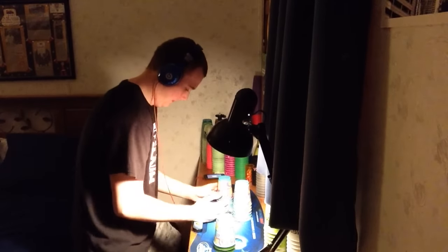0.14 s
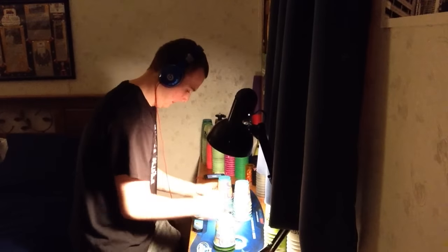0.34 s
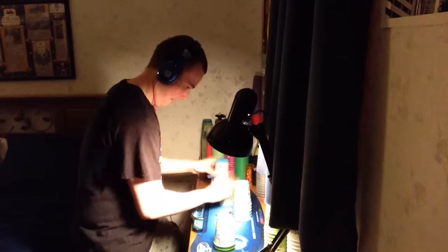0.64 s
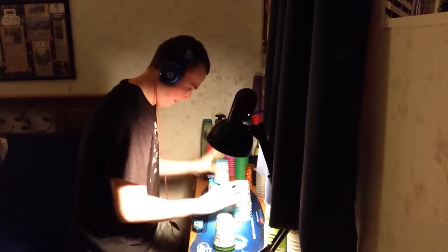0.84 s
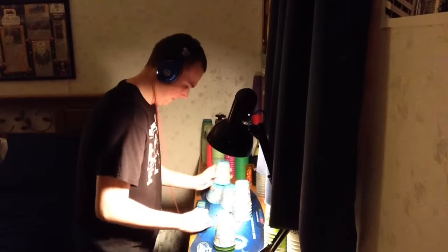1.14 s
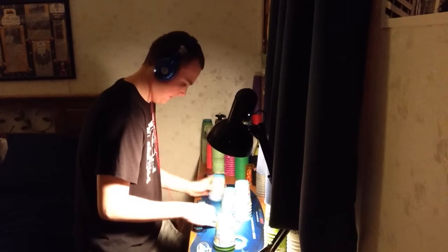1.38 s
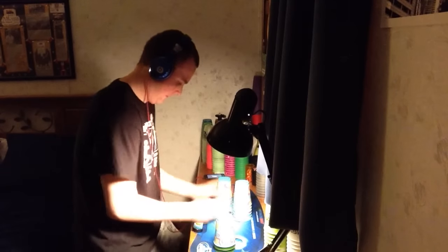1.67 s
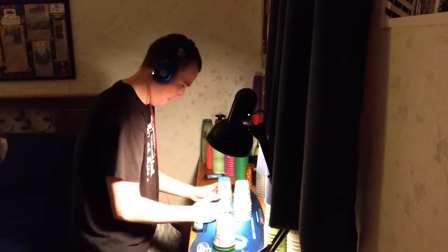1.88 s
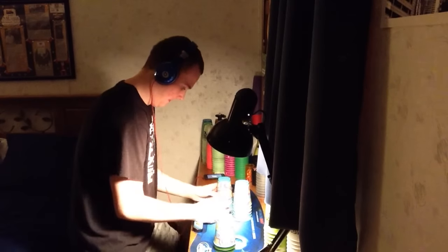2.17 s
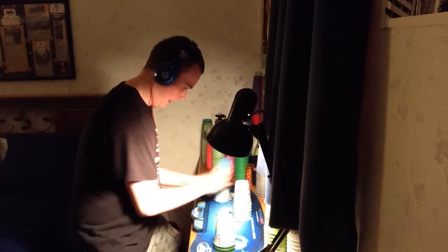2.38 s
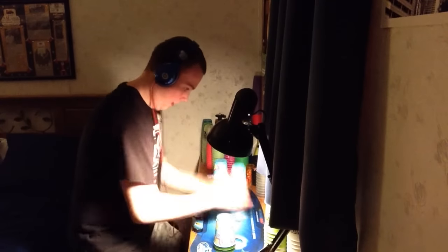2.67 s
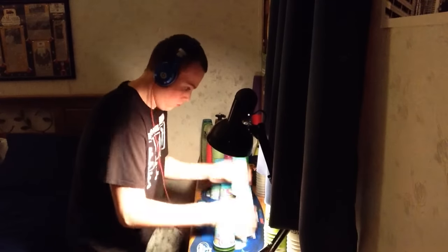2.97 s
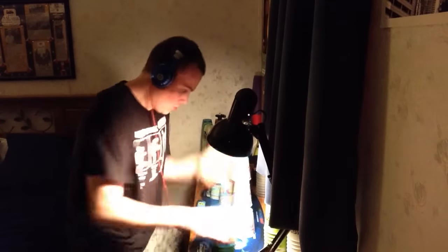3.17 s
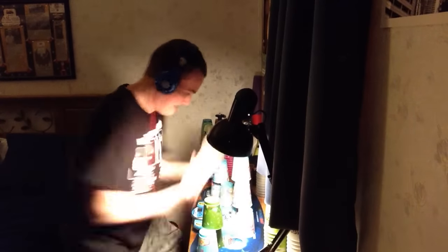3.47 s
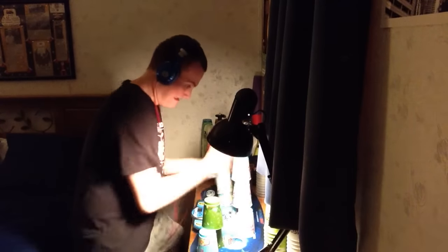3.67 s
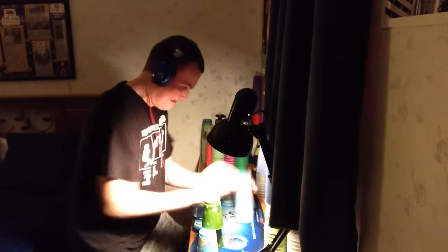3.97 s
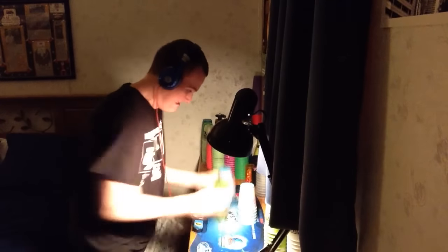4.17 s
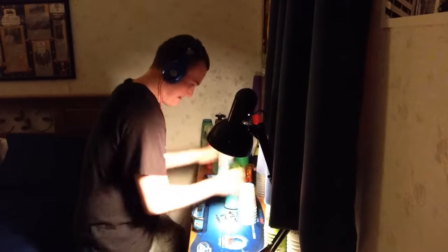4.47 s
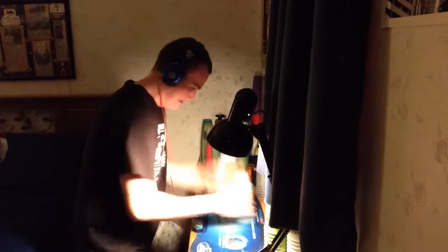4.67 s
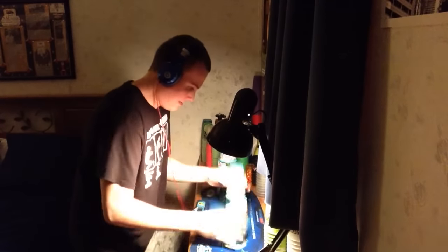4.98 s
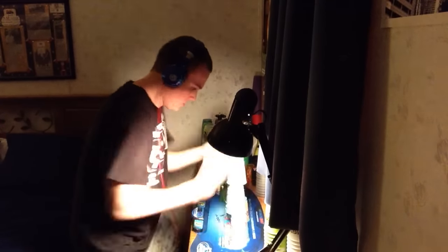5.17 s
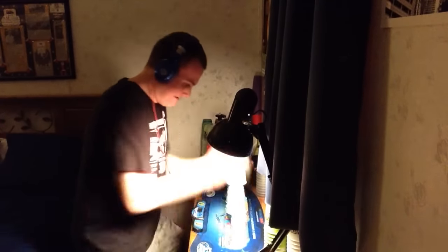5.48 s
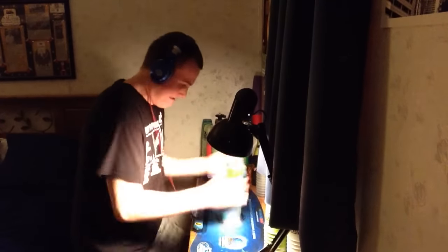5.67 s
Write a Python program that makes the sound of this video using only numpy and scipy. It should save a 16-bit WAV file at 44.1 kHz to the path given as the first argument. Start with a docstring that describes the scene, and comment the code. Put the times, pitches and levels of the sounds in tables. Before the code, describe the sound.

Hollow plastic cups knock, slide and rattle together in quick bursts on a desk in a small room, growing busier and louder.

```python
"""Plastic cups are stacked up and swept down at speed on a mat on a desk, in a small bedroom.
Each landing rings the air inside a cup, its thin wall and the desk as damped modes; rims clack as bursts
of tiny touches on shell modes. Nesting cups slide and rattle as shaped noise and random contacts, air
gulps as short rising hoots, and full stacks boom the desk. A small microphone hears it from across the
room, through echoes and a short diffuse tail, over a faint hush."""
import sys
import numpy as np
from scipy import signal
from scipy.fft import rfft, irfft
from scipy.io import wavfile

SR = 44100
rng = np.random.default_rng(int(sys.argv[2]) if len(sys.argv) > 2 else 0)


def pcm_store(signal):
    """Save signal as 16-bit PCM."""
    levels = np.round(np.clip(np.atleast_2d(signal), -1, 1) * 32767)
    wavfile.write(sys.argv[1], SR, levels.astype(np.int16).T)


N = 257544
AGE = np.arange(int(.3 * SR)) / SR   # time since a contact, s


def from_db(db):
    """Decibels to gain."""
    return 10 ** (np.asarray(db) / 20)


def at_hz(points, hz):
    """Read a table on a log-frequency axis."""
    table = np.array(points)
    return np.interp(np.log(np.maximum(hz, 1)), np.log(table[:, 0]), table[:, 1])


def unit_energy(x):
    """Scale to a sum of squares of 1."""
    return x / np.sqrt(np.sum(x ** 2) + 1e-20)


def coloured(x, spectrum):
    """Give a steady signal a spectrum; rms 1."""
    hz = np.arange(N // 2 + 1) * SR / N
    shaped = irfft(rfft(x) * from_db(at_hz(spectrum, hz)), N)
    return unit_energy(shaped) * np.sqrt(N)


def band(x, low_hz, high_hz):
    """Causal band-pass."""
    sections = signal.butter(2, [low_hz, min(high_hz, .45 * SR)], "band", fs=SR, output="sos")
    return signal.sosfilt(sections, x)


def add(track, s, sound):
    """Mix a short sound into the track at time s."""
    start = max(round(s * SR), 0)
    track[start:start + len(sound)] += sound[:max(N - start, 0)]


def dying(age, t60):
    """Exponential decay by 60 dB in t60."""
    return np.exp(-np.log(1000) * age / t60)


def ring(hz, t60, rise=1e-4):
    """One damped mode that builds up over the contact time; its envelope peaks at 1."""
    swell = (1 - np.exp(-AGE / rise)) * dying(AGE, np.clip(t60, .003, .25))
    return swell / swell.max() * np.sin(2 * np.pi * hz * AGE)


def struck(modes, count, rise):
    """Many blows on one body: each spot favours different modes."""
    rings = np.array([(-1) ** k * from_db(db) * ring(hz, t60, rise)
                      for k, (hz, db, t60) in enumerate(modes)])
    strengths = from_db(rng.normal(0, 0.92, (count, len(modes))))
    return strengths @ rings


def strokes(rows, attack_s, release_s, sag_db):
    """Gain over time for separate hand movements: each swells, sags and stops."""
    gain, now = np.zeros(N), np.arange(N) / SR
    for s, length, db in rows:
        attack = np.clip((now - s) / attack_s, 0, 1) ** 2
        release = np.clip((s + length - now) / release_s, 0, 1)
        sag = sag_db * np.clip((now - s) / length, 0, 1)
        gain += attack * release * from_db(db - sag)
    return gain


def tiny_contacts(per_s):
    """Random touches of uneven strength."""
    return (rng.random(N) < per_s / SR) * rng.normal(0, 1, N)


# The bedroom's decay. Each row: frequency in Hz, t60 in s.
ROOM_DECAY = [(100, 0.19), (200, 0.26), (400, 0.18), (900, .24), (2500, 0.22), (6000, 0.22), (14000, 0.19)]
# First echoes off the desk and near walls. Each row: delay in s before a random stretch, level in dB.
NEAR_ECHOES = [(.0034, -19), (.0072, -9), (.0118, -19)]


def bedroom(build_s=0.0045):
    """Returns the room as a function; the cups keep moving, so each sound takes its own paths to the mic."""
    edges = np.geomspace(60, 17000, 15)   # band limits, Hz
    diffuse = np.array([band(rng.standard_normal(2 * SR), low, high) for low, high in zip(edges, edges[1:])])
    # brings the tail smoothly to silence at its end
    dying_out = np.cos(np.pi / 2 * (AGE / AGE[-1]) ** 2) ** 2
    build_up = 1 - np.exp(-(AGE / build_s) ** 2)
    t60s = at_hz(ROOM_DECAY, np.sqrt(edges[1:] * edges[:-1]))
    fades = np.array([unit_energy(build_up * dying(AGE, t60) * dying_out) for t60 in t60s])

    def heard(sound, tail_db, all_round=None):
        """Direct sound and near echoes, plus a diffuse tail fed by the all-round sound if one is given."""
        early = np.zeros(len(AGE))
        early[0] = 1
        for delay, db in NEAR_ECHOES:
            early[round(delay * SR * 2 ** rng.uniform(-.5, .5))] += from_db(db)
        # a fresh stretch of diffuse noise for every sound
        spot = rng.integers(SR // 10, SR)
        tail = from_db(tail_db) * np.einsum("bt,bt->t", diffuse[:, spot:spot + len(AGE)], fades)
        if all_round is None:
            return signal.fftconvolve(sound, early + tail)
        return signal.fftconvolve(sound, early) + signal.fftconvolve(all_round, tail)
    return heard


# Colour of the faint hush. Each row: frequency in Hz, relative level in dB per Hz.
HUSH_COLOUR = [(18, -52.5), (30, -32.5), (98, -25), (184, 5.5), (449, -17.5), (584, 0.5), (962, -16.5),
               (1160, -11), (1430, -14), (2290, -14), (8300, -19.5), (9460, -17), (10200, -20),
               (14800, -19.5), (16000, -16)]


def faint_hush(level_db=-62):
    """Steady coloured noise lies under everything."""
    return from_db(level_db) * coloured(rng.standard_normal(N), HUSH_COLOUR)


# Cup walls sliding over each other. Each row: start in seconds, length in s, level in dB before the gain.
WALL_SLIDES = [(-.01, 0.11, -38.5), (0.51, 0.14, -46.5), (0.57, 0.13, -47), (1.025, 0.1, -41.5),
               (1.62, 0.051, -44.5), (2.42, 0.079, -44.5), (2.845, .12, -38), (2.99, .08, -54),
               (3.175, 0.17, -35), (3.565, 0.14, -32), (3.715, 0.3, -37), (4.48, 0.088, -36),
               (4.755, 0.072, -34), (4.85, 0.15, -42), (5.065, 0.083, -37.5), (5.11, 0.51, -36)]
# Colour of plastic rubbing on plastic. Each row: frequency in Hz, relative level in dB per Hz.
RUB_COLOUR = [(50, -21.5), (200, 10.5), (400, 1), (650, 9), (1100, 1), (1600, -2.5), (3000, -0.5),
              (5500, -4), (8000, -4.5), (12000, -11), (16000, -18.5)]


def sliding(room, gain_db=-2, smooth_db=-5):
    """Plastic rubbing on plastic: a fine hiss with small catches in it."""
    catches = coloured(tiny_contacts(per_s=700), RUB_COLOUR)
    hiss = from_db(smooth_db) * coloured(rng.standard_normal(N), RUB_COLOUR)
    # each stroke softens as it goes
    movement = strokes(WALL_SLIDES, attack_s=0.017, release_s=0.018, sag_db=14)
    return room(from_db(gain_db) * movement * (catches + hiss), tail_db=0.0)[:N]


# A cup lands on one edge, then drops flat. Each row: start in seconds, air level in dB, air pitch in Hz,
# wall level in dB, wall pitch in Hz, second touch against the first in dB; levels are before the gains.
CUP_LANDINGS = [(0.161, -27.5, 574, -51, 970, 6), (0.44, -24, 616, -47, 890, 2.5),
                (0.516, -30.5, 613, -49, 820, -18), (0.613, -47, 680, -36.5, 1000, -6),
                (0.678, -4.5, 626, -7.5, 875, -1), (0.955, -36.5, 580, -35.5, 880, 0.5),
                (1.037, -25, 789, -21, 835, -9), (1.154, -18.5, 627, -13, 990, -14.5),
                (1.179, -35, 596, -12, 906, -18), (1.403, -32.5, 630, -43, 1010, 1),
                (1.439, -14.5, 626, -32, 1280, -24), (1.613, -30.5, 620, -33.5, 830, -15),
                (1.644, -28.5, 603, -55, 888, -22), (1.686, -31, 620, -45, 835, -12),
                (1.73, -27, 610, -22, 1085, -7), (2.392, -41.5, 636, -43, 1040, -12),
                (2.437, -44, 660, -47, 810, 11), (2.519, -27, 575, -31.5, 1010, -21),
                (2.563, -3, 630, -8.5, 930, -10.5), (2.704, -29, 536, -34, 1050, -21),
                (2.744, -26, 612, -30, 875, 4.5), (2.849, -34, 600, -36.5, 820, 1.5),
                (2.939, -41, 650, -25, 1030, -24), (3.01, -21.5, 573, -38, 802, -22),
                (3.076, -20, 670, -19, 1000, -12), (3.098, -16, 558, -10, 1080, 3.5),
                (3.172, -24.5, 483, -20.5, 930, -17), (3.243, -32.5, 490, -54, 787, -2),
                (3.327, -14, 778, -16.5, 1000, -10), (3.401, -16, 590, -14.5, 904, 8),
                (3.602, -23, 596, -26, 940, 9), (3.733, -23.5, 610, -55, 820, -7),
                (3.802, -20, 546, -18, 1090, 5), (3.842, -6, 570, -21, 1100, -5),
                (3.949, -20.5, 545, -18, 1030, -27), (3.985, -25.5, 730, -31, 920, 2.5),
                (4.022, -8.5, 586, -15, 1120, -17), (4.079, -16.5, 548, -17, 770, 2),
                (4.109, -21, 797, -46, 775, -18), (4.187, -17, 564, -26, 855, -24),
                (4.23, -27.5, 535, -57, 807, -6), (4.33, -22.5, 610, -38, 834, -20),
                (4.482, -26.5, 616, -33, 1000, -17), (4.514, -25.5, 605, -22.5, 990, 2.5),
                (4.569, -11.5, 536, -7.5, 950, -10), (4.713, -32, 656, -39, 1270, -9),
                (4.764, -30.5, 560, -31, 1040, -9), (4.88, -34, 565, -32.5, 860, -4),
                (5.037, -19, 583, -31.5, 1010, -12), (5.092, -24.5, 480, -23.5, 945, 0),
                (5.118, -12.5, 626, -7.5, 980, -8), (5.244, -26, 600, -27, 960, -12),
                (5.280, -17, 646, -23, 870, 9), (5.335, -14.5, 583, -19, 1010, -18),
                (5.362, -18, 756, -32, 796, -12), (5.452, -6, 614, -31, 1060, -32),
                (5.543, -17.5, 650, -12.5, 1030, 2), (5.578, -13, 582, -33, 850, 0.5),
                (5.614, -20, 760, -18, 830, -10), (5.637, -16.5, 537, -28, 1050, -4),
                (5.747, -20, 634, -29, 1130, -9), (5.796, -18, 524, -25, 880, -8)]
SETTLE_S = .015   # from the first touch to the second
CUP_AIR_HZ, CUP_WALL_HZ = 657, 910   # a loose cup's usual pitches


def cup_touches(strays, stray_air_db=-3, stray_wall_db=-5, spread_octaves=0.17):
    """Both touches of each landing, then the stray knocks: (s, air dB, air Hz, wall dB, wall Hz)."""
    rows = []
    for s, air_db, air_hz, wall_db, wall_hz, second_db in CUP_LANDINGS:
        rows += [(s, air_db, air_hz, wall_db, wall_hz),
                 (s + SETTLE_S, air_db + second_db, air_hz, wall_db + second_db, wall_hz)]
    for s, db in strays:
        size = 2 ** rng.normal(0, spread_octaves)
        rows.append((s, db + stray_air_db, CUP_AIR_HZ / size, db + stray_wall_db, CUP_WALL_HZ / size))
    return rows


# Flexing modes of a cup's thin wall. Each row: frequency in Hz, relative level in dB, t60 in s.
WALL_MODES = [(683, -2, 0.0313), (783.7, -3.5, 0.075), (914, 3, 0.021), (1031, 3.5, 0.022),
              (1118, -7, 0.046), (1227, -1.5, 0.038), (1367, -21, 0.016)]
# The desk top and its frame. Each row: frequency in Hz, relative level in dB, t60 in s (ring caps it at 0.25).
DESK_MODES = [(120.4, -16.5, 0.29), (148.4, -7.5, 0.12), (178.1, 0.5, 0.17), (203.5, -1.5, 0.16),
              (233, 4, 0.051), (278, -5.5, 0.033), (298.5, -8, 0.21), (369, -5, 0.18), (444.5, -3.5, 0.092)]
THUMP_DB, THUMP_FOLLOWS = -30.5, 0.56   # desk thump for an air level of 0 dB; dB per dB of that level


def landings(room, strays, air_gain_db=1, wall_gain_db=2.0, air_t60=0.023, wall_octaves=0.42,
             uneven=0.85, knock_db=-7):
    """A landing rings the air in the cup, the thin wall and the desk, each with its own strength."""
    out, mode_hz = np.zeros(N), np.array(WALL_MODES)[:, 0]
    wall_rings = np.array([from_db(db) * ring(hz, t60, rise=0.0059) for hz, db, t60 in WALL_MODES])
    # the mat softens the contact itself to a dull knock
    knock = from_db(knock_db) * ring(1307, 0.003, rise=0.0006)
    rows = cup_touches(strays)
    desk_blows = struck(DESK_MODES, len(rows), rise=0.0016)
    for (s, air_db, air_hz, wall_db, wall_hz), desk in zip(rows, desk_blows):
        air = from_db(air_db + air_gain_db) * ring(air_hz, air_t60, rise=.003)
        # the grip and the cups underneath decide which wall modes speak most
        nearness = np.exp(-(np.log2(mode_hz / wall_hz) / wall_octaves) ** 2)
        wall = (nearness * rng.normal(1, uneven, len(mode_hz))) @ wall_rings
        wall_and_knock = from_db(wall_db + wall_gain_db) * (wall / np.abs(wall).max() + knock)
        thump = from_db(THUMP_DB + THUMP_FOLLOWS * air_db) * desk
        add(out, s, room(air - wall_and_knock, tail_db=-3.5) + room(thump, tail_db=-2.5))
    return out


# Colour of the shell's crowded modes. Each row: frequency in Hz, relative level in dB.
SHELL_COLOUR = [(1200, 16), (1900, 1), (2350, 4.5), (2750, -3), (3300, 1), (4500, -2), (5500, 5.5),
                (7000, -3.5), (10000, 2.5), (13000, -3), (16000, -16)]


def shell_ring(low_hz, high_hz, t60, count):
    """The crowded, quickly damped modes of one cup's shell within a range."""
    hz = low_hz + (high_hz - low_hz) * (np.arange(count) + rng.random(count)) / count
    level_db = at_hz(SHELL_COLOUR, hz) + rng.normal(0, 0.95, count)
    strength = from_db(level_db) * rng.choice([-1, 1], count)
    age = AGE[:SR // 40]
    return strength @ np.sin(2 * np.pi * hz[:, None] * age) * dying(age, t60)


# Rims striking each other. Each row: start in seconds, middle-range level in dB, low shell modes in dB,
# brightness as the top range against the middle level in dB; levels are before the gains.
RIM_CLACKS = [(0.368, -51, -45.5, -12), (0.510, -44, -47, -6), (0.583, -28.5, -58, -11),
              (0.6835, -12.5, -16, -11), (0.956, -46, -55, -16), (1.0375, -30.5, -37.5, -17),
              (1.091, -37, -49, -10), (1.153, -21, -36, -19), (1.160, -24, -30, -2.5),
              (1.178, -21.5, -30.5, -16), (1.294, -38, -64, -8.5), (1.381, -39, -52.5, -8),
              (1.404, -27.5, -39.5, -4.5), (1.4377, -16.5, -15, -6), (1.610, -22, -35, -12.5),
              (1.639, -32.5, -53, -6), (1.688, -38, -53, -7), (1.7075, -32, -35, -9), (1.725, -29, -15, 3),
              (1.731, -15, -23, -7.5), (2.248, -57, -58, -3.5), (2.388, -48.5, -47, -2),
              (2.445, -42.5, -43, -4), (2.519, -20.5, -32, -14), (2.569, -14.5, -19.5, -10.5),
              (2.702, -32, -38.5, -5.5), (2.741, -22, -24, -6.5), (2.907, -36, -41, -3),
              (2.941, -36, -24.5, -4), (2.965, -51, -37, -1), (3.014, -31, -53, -9),
              (3.075, -26.5, -24.5, -17), (3.098, -21, -21, -12), (3.111, -13, -12.5, -13),
              (3.244, -23.5, -46, -9), (3.290, -23, -28.5, -9), (3.327, -24.5, -37, -24),
              (3.400, -29, -24, -11), (3.414, -9.5, -14, -14), (3.618, -22.5, -26, -30),
              (3.666, -27.5, -54, -8), (3.726, -23.5, -39, -4), (3.816, -7.5, -31, -10),
              (3.843, -7.5, -13, -12), (3.856, -20, -11.5, -14), (3.889, -13, -9, -12),
              (3.948, -15, -19, -11), (3.996, -19.5, -27, -7), (4.0225, -15, -15, -3.5),
              (4.088, -10.5, -18.5, -5.5), (4.178, -14.5, -24, -7.5), (4.331, -40, -46.5, -11),
              (4.390, -45, -46, -5), (4.479, -25.5, -43, -14), (4.570, -15, -32, -16),
              (4.583, -25.5, -22, -11), (4.713, -35.5, -36, -4.5), (4.763, -25, -27.5, -6.5),
              (5.053, -26.5, -31, -2), (5.077, -31, -38, -9), (5.119, -15.5, -16, -9.5),
              (5.283, -19.5, -20, -7), (5.295, -9.5, -14.5, -11), (5.318, -18, -16, -8),
              (5.365, -20, -33, -7), (5.444, -14, -19.5, -9), (5.554, -12.5, -16, -9),
              (5.573, -9.5, -11.5, -8), (5.638, -11, -12, -10), (5.708, -27.5, -47, -3),
              (5.750, -23, -24.5, -10), (5.786, -21, -23, -8), (5.823, -24, -30, -9)]
# The stiff rim's longer-lived modes. Each row: frequency in Hz, relative level in dB, t60 in s.
RIM_MODES = [(1614, 2, 0.038), (1823, -3.5, 0.037), (1923, 4, 0.025), (2348, 6.5, 0.035), (2710, -2, 0.025),
             (3000, -9, 0.029), (3262, 7.5, 0.0089), (3800, -7.5, 0.022), (3933, 0, 0.021),
             (4170, 1, 0.017), (5100, -2.5, .025), (6310, -12.5, 0.038)]
CHATTER_S = 0.006   # touch strength falls to 1/e by this age


def clacks(room, strays, stray_db=-4, stray_low_db=-4, stray_bright_db=-11, top_gain_db=20,
           low_gain_db=17.0, mid_gain_db=16.5, rim_gain_db=17, touches_per_s=3500, first_touch=0.6):
    """A rim strikes, then chatters for a few milliseconds; every touch rings the shell and the rim."""
    out, age = np.zeros(N), AGE[:SR // 20]
    # averaged over all directions the shell's modes merge into three smooth ranges
    click = signal.unit_impulse(len(age))
    merged = np.array([unit_energy(band(click, 1250, 2130)),
                       -unit_energy(band(click, 2840, 7080)),
                       unit_energy(band(click, 7470, 13900))])
    rows = RIM_CLACKS + [(s, db + stray_db, db + stray_low_db, stray_bright_db) for s, db in strays]
    for (s, db, low_db, bright_db), rim in zip(rows, struck(RIM_MODES, len(rows), rise=0.00035)):
        happens = rng.random(len(age)) < touches_per_s / SR
        touches = happens * rng.normal(0, 1, len(age)) * np.exp(-(age / CHATTER_S) ** 2)
        touches[0] = first_touch
        shells = (shell_ring(1130, 2600, t60=0.038, count=12),
                  shell_ring(2620, 8890, t60=0.0066, count=44),
                  shell_ring(8990, 16000, t60=0.0091, count=40))
        ranges = np.array([unit_energy(signal.fftconvolve(touches, shell)[:len(age)]) for shell in shells])
        strength = from_db([low_db + low_gain_db, db + mid_gain_db, db + bright_db + top_gain_db])
        # blows that bend the whole shell also set the rim ringing
        rim_touches = signal.fftconvolve(touches, rim[:len(age)])[:len(age)]
        rim_ring = from_db(low_db + rim_gain_db) * unit_energy(rim_touches)
        all_round = strength @ merged + rim_ring
        add(out, s, room(strength @ ranges + rim_ring, tail_db=-2.5, all_round=all_round))
    return out


# Whole stacks slammed down on the desk. Each row: start in seconds, frame level in dB,
# desk top level in dB; levels are before the gains.
STACK_SLAMS = [(0.682, -48.5, -28.5), (1.44, -53, -32), (1.731, -65, -26), (2.559, -69, -30),
               (3.406, -33, -20.5), (3.844, -33, -19), (4.076, -21, -17.5), (5.281, -42, -18),
               (5.45, -42, -15.5), (5.592, -19, -17.5), (5.616, -26, -16), (5.644, -42, -13.5)]
# Booming modes of the desk frame. Each row: frequency in Hz, relative level in dB, t60 in s.
FRAME_MODES = [(44.7, -23.5, .06), (72, -15.5, .08), (98, -2.5, 0.15), (126.5, 4, 0.13)]


def slams(room, gain_db=-4, top_gain_db=-5.5):
    """A full stack is heavy enough to thump the desk top and make its frame boom."""
    out = np.zeros(N)
    booms = struck(FRAME_MODES, len(STACK_SLAMS), rise=0.0015)
    thumps = struck(DESK_MODES, len(STACK_SLAMS), rise=0.0012)
    for (s, db, top_db), boom, thump in zip(STACK_SLAMS, booms, thumps):
        slam = from_db(db + gain_db) * boom + from_db(top_db + top_gain_db) * thump
        add(out, s, room(slam, tail_db=-4))
    return out


# Air gulping in and out as nested cups part. Each row: start in seconds, level in dB before the gain,
# pitch in Hz at the loudest moment.
AIR_GULPS = [(1.706, -16.5, 620), (2.408, -20, 650), (2.86, -26, 530), (2.892, -19.5, 620),
             (2.968, -25, 780), (3.765, -23.5, 640), (4.767, -16.5, 568), (4.904, -26.5, 590),
             (5.22, -16.5, 976), (5.384, -7.5, 596), (5.462, -8, 580)]


def gulps(room, gain_db=0, peak_s=0.00774, width_s=0.0043, glide_per_s=4):
    """Air drawn through the gap between two cups swells into a short hoot that bends upward."""
    out, from_peak = np.zeros(N), AGE[:SR // 20] - peak_s
    swell = np.exp(-(from_peak / width_s) ** 2)
    for s, db, hz in AIR_GULPS:
        hoot = np.sin(2 * np.pi * hz * (from_peak + glide_per_s * from_peak ** 2 / 2))
        add(out, s, from_db(db + gain_db) * room(swell * hoot, tail_db=-8.5))
    return out


# A handful of cups collapsing into a stack. Each row: start in seconds, length in s,
# level in dB before the gains.
CUP_SWEEPS = [(3.811, 0.18, -16), (4.067, 0.08, -17), (5.288, .15, -13.5), (5.44, 0.11, -16),
              (5.545, 0.12, -8.5), (5.633, 0.0956, -16), (5.778, 0.088, -21)]
SWEEP_SAG_DB = 12.5   # the jostling weakens by this much over a collapse
# Colour of the jostling. Each row: frequency in Hz, relative level in dB per Hz.
RATTLE_COLOUR = [(60, -57), (200, 5.5), (400, -0.5), (700, 9), (1200, 3.5), (1800, 2.5), (3300, 0),
                 (5500, -8.5), (9000, -10.5), (16000, -14.5)]


def rattling(room, gain_db=-7):
    """Cups falling into one another jostle in a thick run of tiny contacts."""
    jostle = coloured(tiny_contacts(per_s=600), RATTLE_COLOUR)
    # the jostling dies as the cups seat
    movement = strokes(CUP_SWEEPS, attack_s=0.0041, release_s=0.091, sag_db=SWEEP_SAG_DB)
    return room(from_db(gain_db) * movement * jostle, tail_db=0)[:N]


def tumbles(count=6, gap_s=.035, spread_db=2):
    """Stray knocks at uneven gaps, weakening through each collapse: (s, dB)."""
    knocks = []
    for s, length, db in CUP_SWEEPS:
        ages = gap_s * (np.arange(1, count + 1) + rng.uniform(-.3, .3, count))
        levels = db - SWEEP_SAG_DB * ages / length + rng.normal(0, spread_db, count)
        knocks += [(s + age, level) for age, level in zip(ages, levels) if age < length]
    return knocks


def scene():
    """The cups in the room, over a faint hush."""
    room, strays = bedroom(), tumbles()
    cups = sliding(room) + landings(room, strays) + clacks(room, strays)
    cups += slams(room) + gulps(room) + rattling(room)
    return (cups + faint_hush())[None]


def record(dry, bass_cut_hz=35, top_cut_hz=16000, ceiling=.85):
    """The microphone loses the deepest bass and rounds the loudest peaks; the top is cut."""
    thinned = signal.sosfilt(signal.butter(2, bass_cut_hz, "high", fs=SR, output="sos"), dry)
    rounded = ceiling * np.tanh(thinned / ceiling)
    return signal.sosfilt(signal.ellip(10, .1, 80, top_cut_hz, fs=SR, output="sos"), rounded)


dry = scene()
out = record(dry)
pcm_store(out)
```